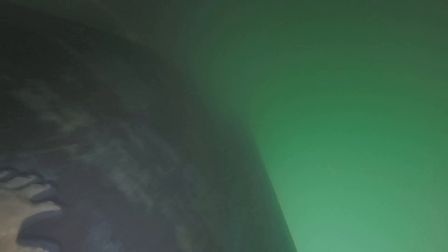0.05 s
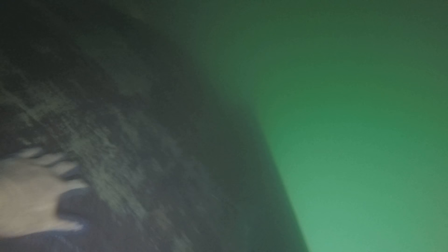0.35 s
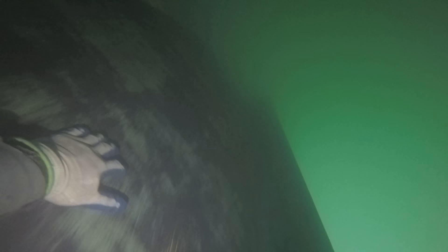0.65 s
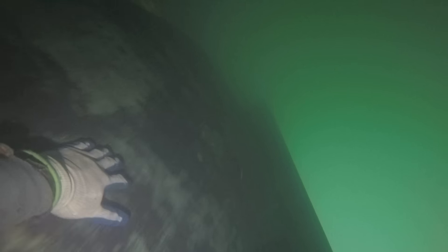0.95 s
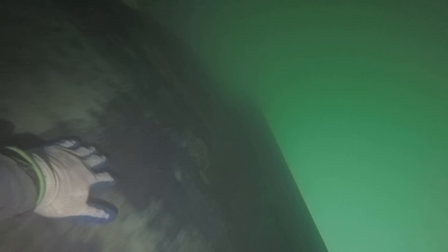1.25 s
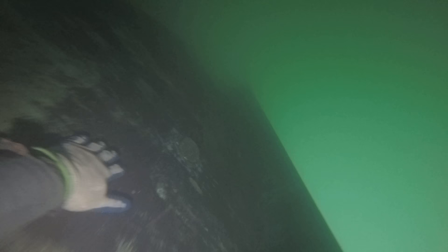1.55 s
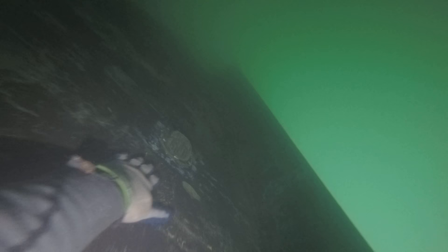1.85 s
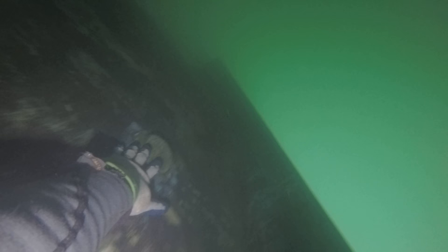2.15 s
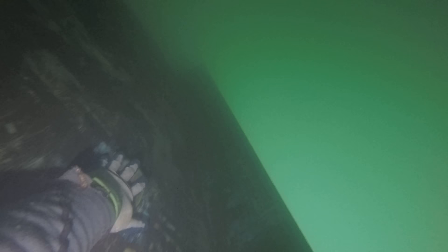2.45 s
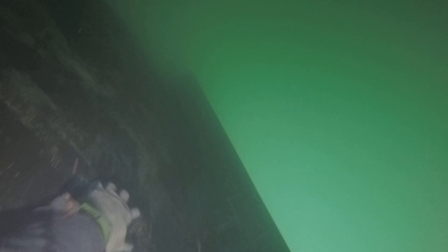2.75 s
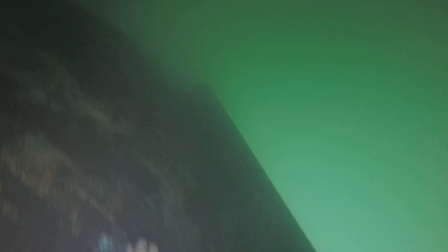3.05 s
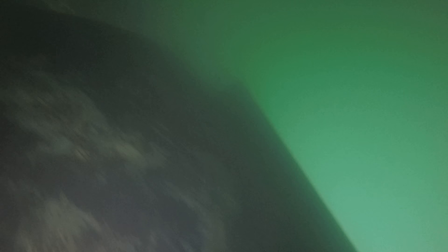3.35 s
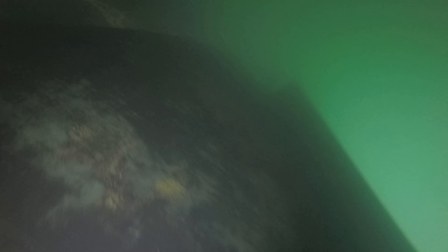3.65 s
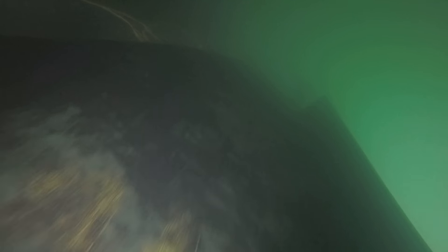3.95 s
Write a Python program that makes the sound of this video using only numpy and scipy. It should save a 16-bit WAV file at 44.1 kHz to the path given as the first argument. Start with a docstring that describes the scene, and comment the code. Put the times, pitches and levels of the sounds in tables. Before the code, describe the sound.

A muffled underwater rumble runs throughout, with faint hiss and scattered sharp ticks. From about 0.6 seconds, bumps hit the camera housing and air escapes, bubbling until 1.1. A heavy bump lands at 2 seconds, followed by finger taps and close glove rubbing. The hardest knock comes just before 3 seconds, slightly distorted. The glove scrapes until about 3.5, leaving the rumble and ticks.

```python
"""Underwater beside a boat hull, heard from a diver's camera microphone in a watertight housing.
Moving water rumbles from the start, and sharp snaps tick near and far over a faint hiss.
Just after half a second, bumps ring the housing; air escapes with a thud and rings as a few bubbles.
From two seconds come more bumps and finger taps, and a glove rubs in tiny slips. The hardest knock
overloads near three seconds; the glove scrapes on briefly, leaving the rumble and the snaps."""
import sys
import numpy as np
from scipy import signal
from scipy.fft import rfft, irfft
from scipy.io import wavfile

SR = 44100
rng = np.random.default_rng(int(sys.argv[2]) if len(sys.argv) > 2 else 0)


def int16_out(signal):
    """Quantize to a 16-bit WAV file."""
    q = np.round(np.clip(np.atleast_2d(signal).T, -1, 1) * 32767)
    wavfile.write(sys.argv[1], SR, q.astype(np.int16))


N = 176400
TIME = np.arange(N) / SR


def from_db(db):
    """Decibels to gain."""
    return 10 ** (np.asarray(db) / 20)


def level(curve):
    """Gain over time from (time [s], level [dB]) points."""
    return from_db(np.interp(TIME, *np.transpose(curve)))


def colour(x, spectrum):
    """Give a steady noise a spectrum; rms 1."""
    hz, db = np.transpose(spectrum)
    bins_hz = np.arange(N // 2 + 1) * SR / N
    gain = from_db(np.interp(np.log(bins_hz + .01), np.log(hz), db))
    shaped = irfft(rfft(x) * gain, N)
    return shaped / shaped.std()


def noise(spectrum):
    """Coloured noise, rms 1."""
    return colour(rng.standard_normal(N), spectrum)


def drift(rate_hz):
    """A line wandering between random values."""
    return np.interp(TIME * rate_hz, np.arange(1000), rng.standard_normal(1000))


def clicks(times, db):
    """Single impulses at the given times."""
    return np.bincount((np.asarray(times) * SR).astype(int), from_db(db), N)[:N]


def fade(hits, rise, t60):
    """Each impulse starts an envelope that rises quickly, then dies."""
    lag = np.exp(-1 / (rise * SR))
    decay = np.exp(-np.log(1000) / (t60 * SR))
    return signal.lfilter([1 - lag], np.convolve([1, -lag], [1, -decay]), hits + 1e-18)


def burst(start, hz, db, rise, t60, glide=0):
    """A sine that swells, then dies; its pitch climbs by the share `glide` each second."""
    out, first = np.zeros(N), int(start * SR)
    t = TIME[:min(int((rise + 1.5 * t60) * SR), N - first)]
    swell = np.sin(np.pi / 2 * np.minimum(t / rise, 1)) ** 2
    dying = np.exp(-np.log(1000) * np.maximum(t - rise, 0) / t60)
    tone = np.sin(2 * np.pi * hz * t * (1 + glide * t / 2))
    out[first:first + len(t)] = from_db(db) * swell * dying * tone
    return out


# Steady hiss and whine at the microphone: (frequency [Hz], relative level [dB])
HISS_SPECTRUM = [(100, 2), (400, 1), (500, -0.5), (600, 2), (750, -6), (1250, -11.5), (1520, 0), (1750, -7),
                 (2100, -0.5), (2700, -15), (3900, -10), (4800, -16), (6200, -17), (7800, -20.5),
                 (9200, -21), (12000, -24), (15500, -37)]
WHINE_SPECTRUM = [(8000, -40), (8400, -8), (8550, 0), (8700, -8), (9100, -40)]
def hiss():
    """A faint hiss with a fainter high whine, behind everything else."""
    return from_db(-57.5) * noise(HISS_SPECTRUM) + from_db(-81) * noise(WHINE_SPECTRUM)


# Water moving all around the housing: (time [s], level [dB])
FLOW_LEVEL = [(0, -30), (.27, -36.5), (.6, -26), (1.1, -32.5), (1.35, -29), (1.9, -32), (2.3, -29),
              (2.6, -32), (2.9, -26.5), (3.05, -32), (3.3, -31), (3.5, -27), (4, -31)]
# Its rumble, heard from inside: (frequency [Hz], relative level [dB])
RUMBLE_SPECTRUM = [(12, -31.5), (20, 0.5), (30, 5), (52, -11.5), (72, -4), (88, -14), (108, -22.5),
                   (140, -26), (180, -35), (300, -43.5), (500, -84.5)]
# Low booms at the microphone: (time [s], frequency [Hz], level [dB], rise [s], t60 [s])
LOW_BOOMS = [(0.595, 29, -15.5, 0.048, 0.51), (0.754, 29.4, -12, 0.027, 0.46),
             (1.967, 28.18, -6, 0.049, 0.66), (2.733, 29.8, -18, 0.035, 0.26),
             (2.888, 66.7, -11.5, 0.046, 0.079)]
def water():
    """Moving water rumbles; a few low booms swell and die, mostly around the bumps."""
    return level(FLOW_LEVEL) * noise(RUMBLE_SPECTRUM) + sum(burst(*boom) for boom in LOW_BOOMS)


# Nearer snaps, out in the water: (time [s], level [dB], t60 [s])
NEAR_SNAPS = [(0.097, -52.5, 0.073), (0.4338, -53, 0.023), (.456, -49, 0.04), (0.63, -47, 0.087),
              (0.8203, -36, 0.042), (0.8415, -47, 0.0099), (0.897, -47, 0.045), (0.906, -68, 0.018),
              (1.036, -53, 0.017), (1.3243, -33, 0.025), (1.365, -52.5, 0.052), (1.619, -48.5, 0.12),
              (1.7938, -45.5, 0.028), (2.409, -54, 0.056), (2.458, -54, 0.058), (2.5986, -46.5, 0.017),
              (3.027, -56, 0.029), (3.8465, -45.5, 0.042), (3.898, -58, 0.027)]
# A snap as it reaches the microphone: (frequency [Hz], relative level [dB])
SNAP_SPECTRUM = [(500, -27.5), (1400, 1.5), (2200, 13), (3500, 7), (4700, -0.5), (5800, 10), (7500, -6.5),
                 (10000, -5), (15000, -30)]
def snaps(tail_db=-25, tail_t60=0.2, far_per_s=31, far_db=-71, far_t60=0.027):
    """Sharp ticks, near and far, smeared by reflections from hull and surface."""
    rise_share = 0.012  # of the decay time
    near = sum(fade(clicks([start], [db]), rise_share * t60, t60) for start, db, t60 in NEAR_SNAPS)
    times, levels_db, _ = np.transpose(NEAR_SNAPS)
    tails = fade(clicks(times, levels_db + tail_db), rise_share * tail_t60, tail_t60)
    far_hits = (rng.random(N) < far_per_s / SR) * from_db(far_db + 2 * rng.standard_normal(N))
    far = fade(far_hits, rise_share * far_t60, far_t60)
    return noise(SNAP_SPECTRUM) * (near + tails + far)


def bubble(start, hz, db, rise_cycles=2.06, t60_at_1khz=0.041):
    """A bubble swells over a few cycles, rings and rises in pitch; small ones die sooner."""
    t60 = t60_at_1khz * (1000 / hz) ** 0.63
    return burst(start, hz, db, rise_cycles / hz, t60, glide=0.58)


def froth(start, length, first_hz, last_hz, db, count=48, pitch_spread=.3, spread_db=3.5):
    """A release of air breaks into ever smaller bubbles."""
    out = np.zeros(N)
    for progress in np.linspace(0, 1, count):
        higher, louder = rng.standard_normal(2)
        hz = first_hz * (last_hz / first_hz) ** progress * np.exp(pitch_spread * higher)
        out += bubble(start + length * progress, hz, db + spread_db * louder)
    return out


# Single bubbles beside the hull: (time [s], pitch [Hz], level [dB])
SINGLE_BUBBLES = [(.762, 620, -40.5), (.777, 620, -33), (.791, 2110, -39.5), (0.797, 3440, -43),
                  (.792, 650, -30.5), (.811, 586, -25), (0.81, 1014, -41), (.821, 604, -44.5),
                  (.842, 4100, -33.5), (.843, 817, -36.5), (0.86, 3540, -48), (.866, 1050, -39),
                  (.869, 815, -50), (.871, 2430, -37.5), (.908, 3450, -35), (0.909, 987, -33),
                  (.977, 636, -24.5), (1.007, 2390, -39), (1.008, 650, -44), (1.017, 2220, -41.5),
                  (1.022, 680, -34.5), (1.039, 3420, -36), (1.037, 1044, -40), (1.042, 1010, -35.5),
                  (1.063, 1150, -37), (1.067, 820, -50), (1.084, 1340, -52), (1.54, 1560, -40.5),
                  (1.542, 1160, -44.5)]
# Froth in each release of air: (time [s], length [s], first pitch [Hz], last pitch [Hz], level [dB])
AIR_RELEASES = [(0.76, .16, 600, 1050, -49), (0.961, .115, 620, 1050, -50)]
# Water churning as the air tears loose: (time [s], level [dB], t60 [s])
CHURN_PULSES = [(0.756, -27.5, 0.12), (.792, -28, 0.17), (.866, -44, 0.14), (0.977, -30, 0.081),
                (1.01, -45, 0.32)]
# The churn at the microphone: (frequency [Hz], relative level [dB])
CHURN_SPECTRUM = [(70, 5.5), (150, 3.5), (220, 1.5), (330, -3), (420, -10), (600, -1), (900, -29),
                  (1500, -28.5), (2500, -52.5)]
def bubbles(echo_db=-9, echo_t60=0.04):
    """Single bubbles and froth over churning water, smeared by the hull close by."""
    direct = sum(bubble(*row) for row in SINGLE_BUBBLES) + sum(froth(*row) for row in AIR_RELEASES)
    churning = sum(fade(clicks([start], [db]), rise=0.0017, t60=t60) for start, db, t60 in CHURN_PULSES)
    direct += noise(CHURN_SPECTRUM) * churning
    scatter = rng.standard_normal(N) * np.exp(-np.log(1000) * TIME / echo_t60)
    echo = signal.fftconvolve(direct, scatter / np.linalg.norm(scatter))[:N]
    return direct + from_db(echo_db) * echo


def friction(spectrum, curve, slips_per_s=2500, flutter_db=3.45, flutter_hz=30.38):
    """Dense tiny slips of the glove, coloured by the housing; the level flutters."""
    slips = (rng.random(N) < slips_per_s / SR) * rng.standard_normal(N)
    return colour(slips, spectrum) * level(curve) * from_db(flutter_db * drift(flutter_hz))


# The glove on the housing, right by the microphone: (time [s], level [dB])
RUB_LEVEL = [(0, -79.5), (1.9, -76), (2.05, -46.5), (2.22, -49), (2.4, -38), (2.52, -33.5), (2.599, -48),
             (2.68, -37), (2.76, -36), (2.83, -36.5), (2.885, -58), (2.904, -41), (2.94, -18), (3.02, -71),
             (3.13, -43), (3.19, -38.5), (3.28, -42.5), (3.4, -41.5), (3.47, -52.5), (3.539, -65), (4, -51)]
SCRAPE_LEVEL = [(0, -67.5), (2.6, -83), (2.76, -59), (2.86, -78), (2.942, -55), (3.0, -84), (3.14, -56.5),
                (3.24, -50.5), (3.3, -52), (3.381, -57), (3.44, -64), (4, -92)]
RASP_LEVEL = [(0, -87), (2.86, -97), (2.905, -57), (2.943, -49), (2.991, -90), (3.07, -58), (3.11, -62),
              (3.16, -65.5), (3.24, -58.5), (3.3, -73.5), (3.37, -55), (3.44, -64.5), (3.5, -75.5),
              (4, -83)]
# Each touch heard through the housing wall: (frequency [Hz], relative level [dB])
RUB_SPECTRUM = [(60, 9.5), (130, 4), (210, 1.5), (300, -4.5), (390, -11), (480, -17), (600, -10.5),
                (800, -26.5), (1250, -28), (1550, -29.5), (2200, -44.5), (3500, -41.5), (8000, -62),
                (16000, -62.5)]
SCRAPE_SPECTRUM = [(200, -35), (340, -11.5), (388, -6), (450, -8.5), (520, -6.5), (590, 23.5), (660, -5.5),
                   (770, 2), (950, 1.5), (1250, -21), (2000, -14), (5000, -44.5), (12000, -56)]
RASP_SPECTRUM = [(900, -14), (1300, -17), (1500, 9.5), (1720, 5), (2000, -2), (2600, -13.5), (3500, -19),
                 (6000, -39.5), (12000, -45.5)]
def glove():
    """The glove rubs dully, scrapes hard enough to ring the housing, and rasps where it catches."""
    rub = friction(RUB_SPECTRUM, RUB_LEVEL)
    scrape = friction(SCRAPE_SPECTRUM, SCRAPE_LEVEL)
    rasp = friction(RASP_SPECTRUM, RASP_LEVEL)
    return rub + scrape + rasp


# Bumps and finger taps on the housing, and the thud of escaping air near one second, all very close:
# (time [s], thump [dB], boom [dB], body [dB], ring [dB], crack [dB], contact time [s])
IMPACTS = [(.560, -33.5, -66, -39.5, -53.5, -70, .0035), (0.72, -26, -31, -39, -58, -78, 0.0048),
           (.7375, -40, -61, -20, -48, -53, 0.0033), (.7415, -12.5, 2, -26.5, -47, -77, 0.0024),
           (.976, -45, -30.5, -33, -64, -56, 0.0029), (1.955, -23, -50, -35.5, -47, -73, 0.0055),
           (1.9700, -8, -8, -36, -34.5, -38.5, 0.0029), (1.9735, -14, -14.5, -22.5, -40, -64, 0.0016),
           (1.99, -40, -14.5, -29, -47, -62.5, 0.003), (2.024, -31, -43, -33.5, -58, -44.5, 0.0031),
           (2.135, -29, -55, -45, -52, -56, 0.0065), (2.277, -65, -25.5, -32.5, -34, -89, 0.0097),
           (2.2865, -55, -35, -29, -25, -86, 0.0028), (2.293, -33, -30.5, -25.5, -71, -78, 0.0083),
           (2.345, -28.5, -41, -39, -55, -73, 0.0084), (2.490, -34, -29.5, -24, -37, -57, 0.0056),
           (2.9452, -14.5, -18, -23, -20, -49, 0.0037), (2.9575, -7, -4, -12.5, 3, -11, 0.0027),
           (2.9605, -6, -11, -19.5, -16.5, -58.5, 0.0056), (3.0825, -21, -28.5, -15.5, -35, -37.5, 0.0027)]
# Where thump, boom, body, ring and crack lie: (frequency [Hz])
ZONES_HZ = [80, 180, 550, 1550, 4000]
# Modes of the housing around the microphone: (frequency [Hz], relative level [dB], t60 [s])
HOUSING_MODES = [(79.6, 5, 0.11), (144, -6, .045), (180.7, -7.5, 0.04), (248, -23, 0.023),
                 (388.5, -2, 0.068), (561, -0.5, 0.053), (633.4, -5.5, 0.055), (740.5, -18.5, 0.06),
                 (893, -13, 0.015), (1225, -12, 0.023), (1497, -1.5, 0.021), (1652, -4, 0.0081),
                 (1989, -3, 0.0087), (2610, -18, .012), (3158, -6.5, 0.006), (4700, -13, 0.009)]
# An impact's hard crack and soft scuff: (frequency [Hz], relative level [dB])
CRACK_SPECTRUM = [(300, -27.5), (1000, -7), (1600, 7.5), (2200, 11.5), (2650, 5.5), (3200, -4.5),
                  (3800, -1.5), (4250, -7), (5100, -21.5), (5800, -18.5), (7500, -12), (11000, -26.5),
                  (16000, -32)]
SCUFF_SPECTRUM = [(100, -21), (250, 7), (420, -15.5), (700, 19), (950, 3.5), (1300, -6), (2500, -54)]
def impacts(scuff_db=-11, spread_db=1.5, detune=.009):
    """Each impact scuffs and rings the housing; soft ones swell slowly, hard ones crack."""
    times, *_, crack_db, _ = np.transpose(IMPACTS)
    cracks = fade(clicks(times, crack_db), rise=0.00023, t60=0.023)
    scuffs = sum(fade(clicks([start], [body_db + scuff_db]), rise=0.356 * contact_s, t60=0.055)
                 for start, _, _, body_db, _, _, contact_s in IMPACTS)
    out = noise(CRACK_SPECTRUM) * cracks + noise(SCUFF_SPECTRUM) * scuffs
    for start, *zones_db, contact_s in IMPACTS:
        for k, (hz, mode_db, t60) in enumerate(HOUSING_MODES):
            louder, higher = rng.standard_normal(2)
            strength_db = np.interp(np.log(hz), np.log(ZONES_HZ), zones_db) + spread_db * louder
            gripped_hz = hz * (1 + detune * higher)  # the grip shifts each mode a little
            out += (-1) ** k * burst(start, gripped_hz, mode_db + strength_db, contact_s, t60)
    return out


def scene():
    """Everything at the one microphone inside the housing."""
    return (hiss() + water() + snaps() + bubbles() + glove() + impacts())[None]


def record(dry, knee=5, cutoff_hz=16700):
    """The camera overloads softly on the hardest knock and cuts the highest treble."""
    rounded = dry / (2.0 + np.abs(dry) ** knee) ** (1 / knee)
    lowpass = signal.cheby2(12, 70, cutoff_hz, fs=SR, output="sos")
    return signal.sosfilt(lowpass, rounded)


dry = scene()
out = record(dry)
int16_out(out)
```